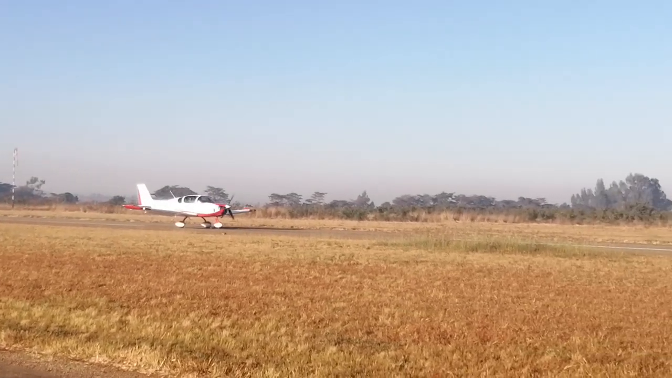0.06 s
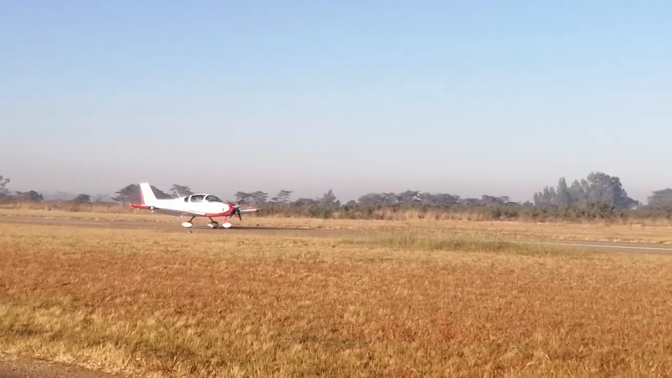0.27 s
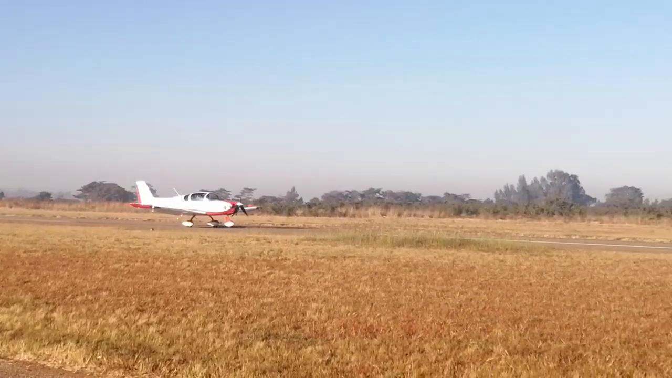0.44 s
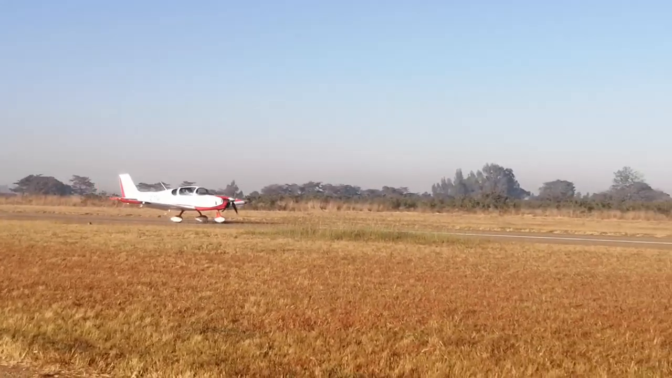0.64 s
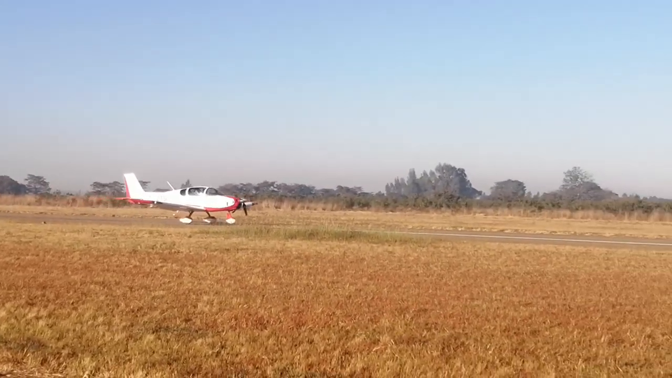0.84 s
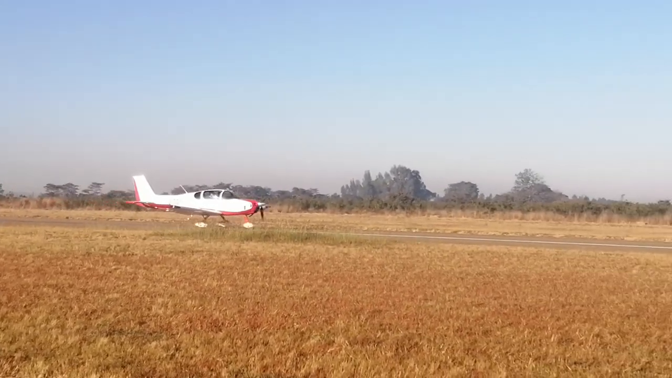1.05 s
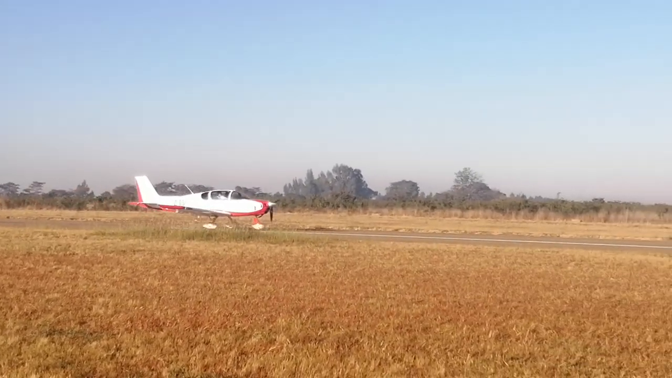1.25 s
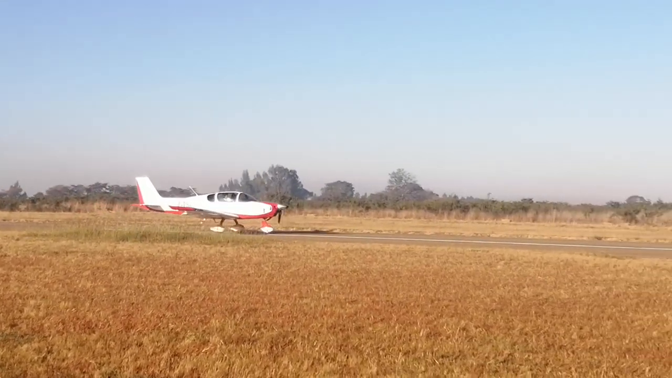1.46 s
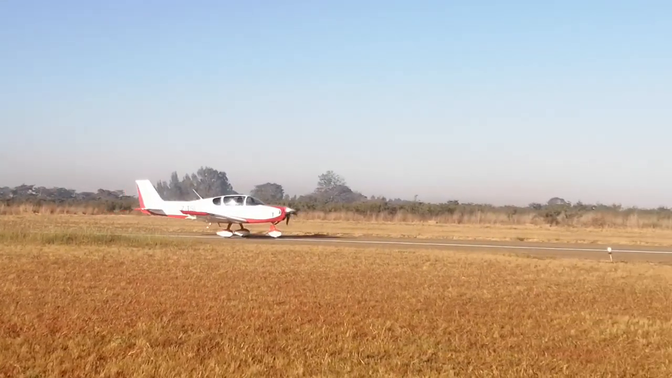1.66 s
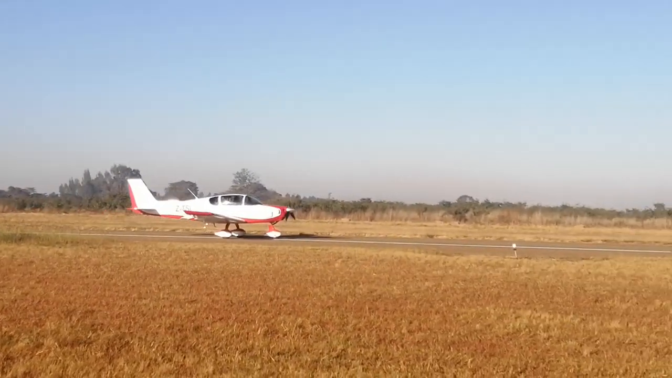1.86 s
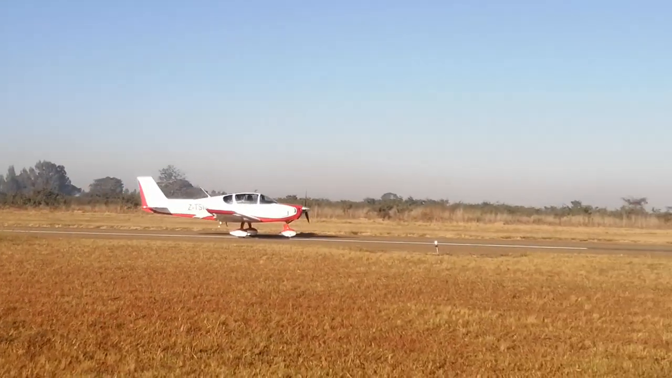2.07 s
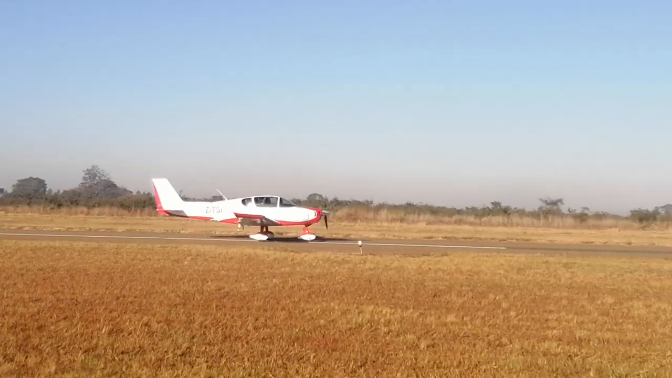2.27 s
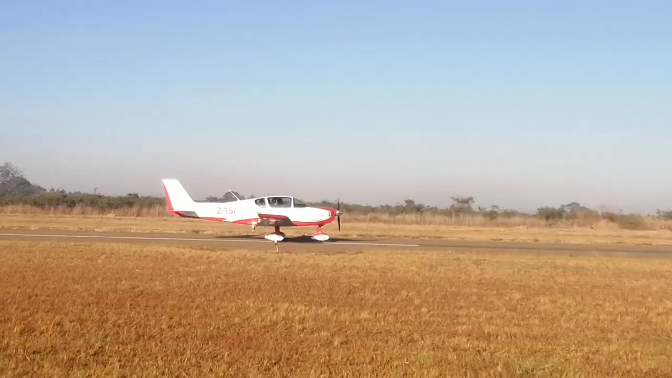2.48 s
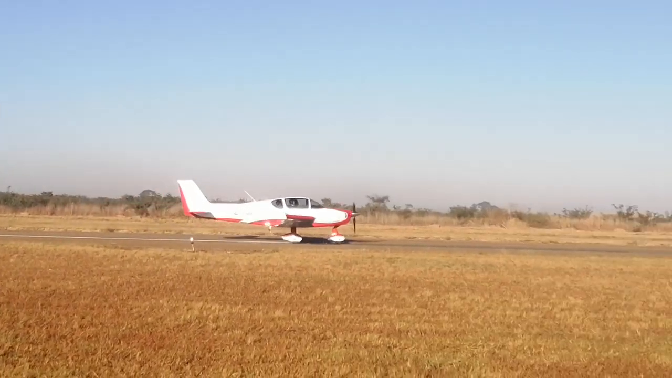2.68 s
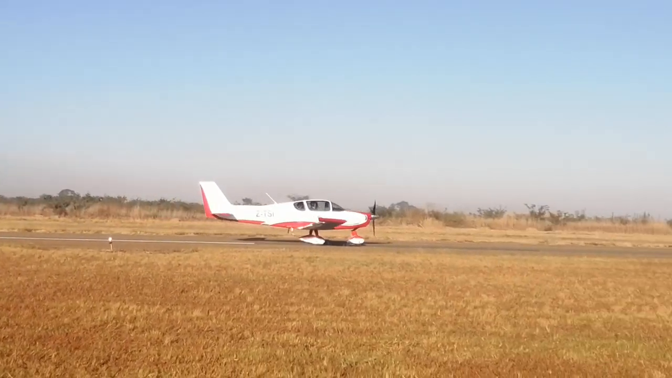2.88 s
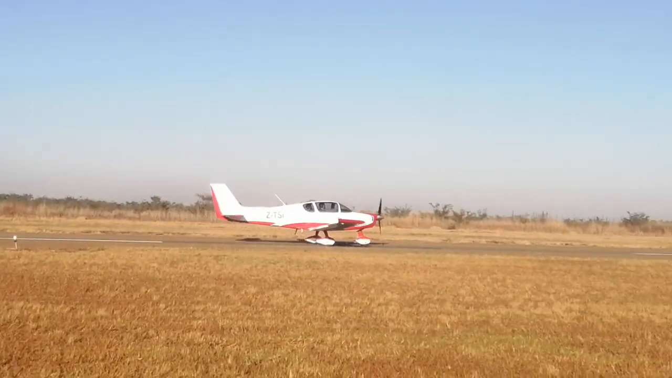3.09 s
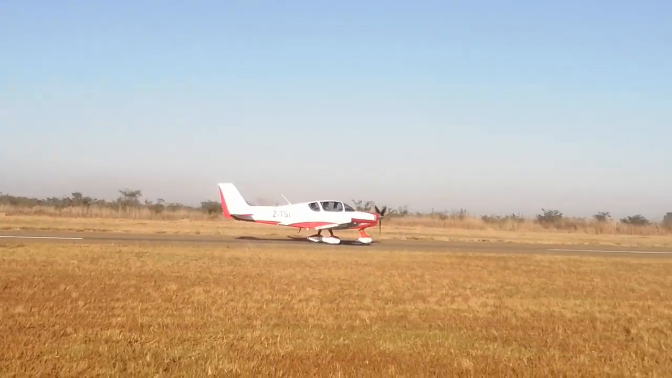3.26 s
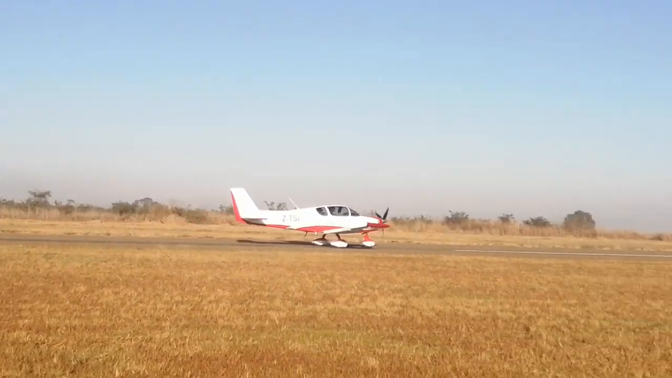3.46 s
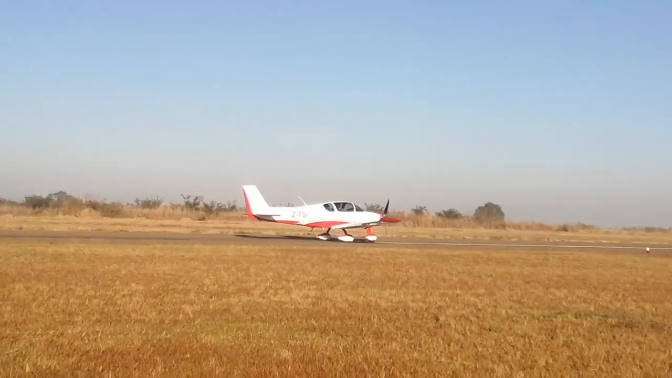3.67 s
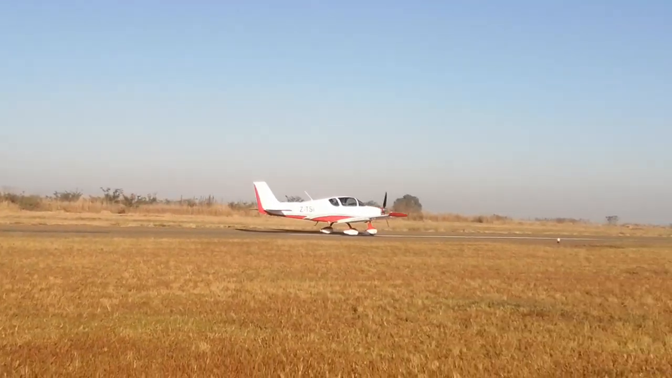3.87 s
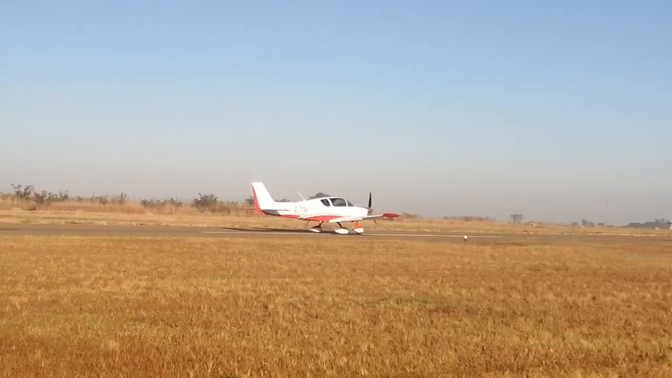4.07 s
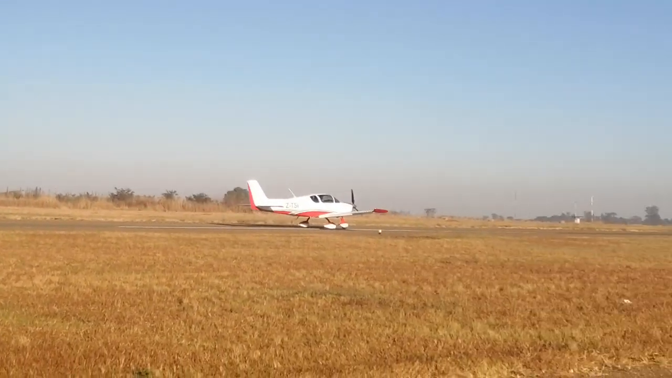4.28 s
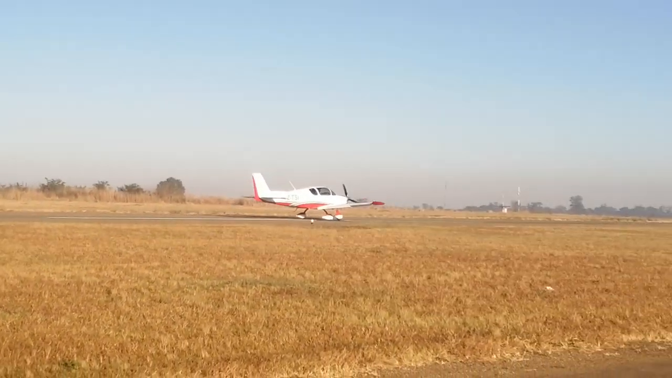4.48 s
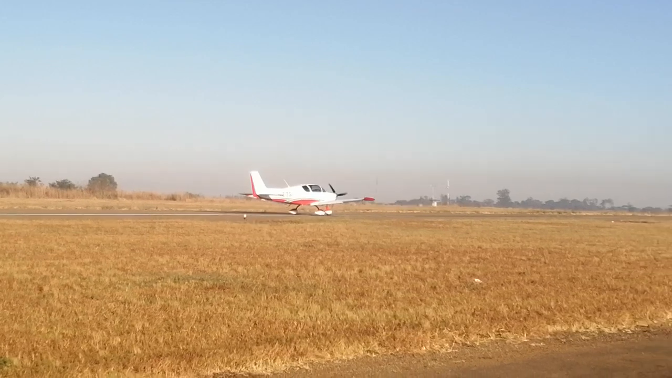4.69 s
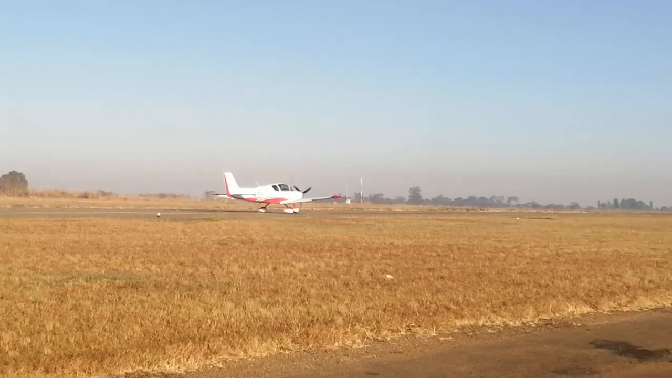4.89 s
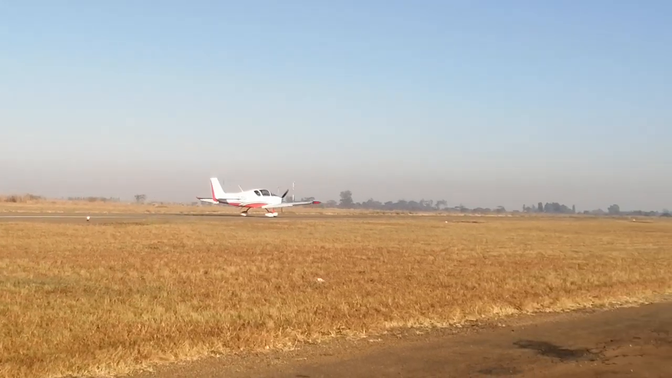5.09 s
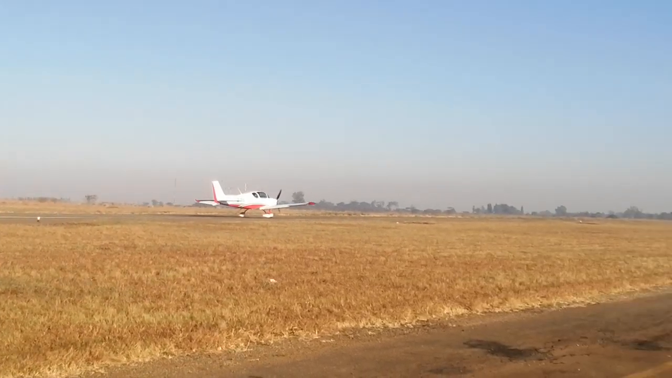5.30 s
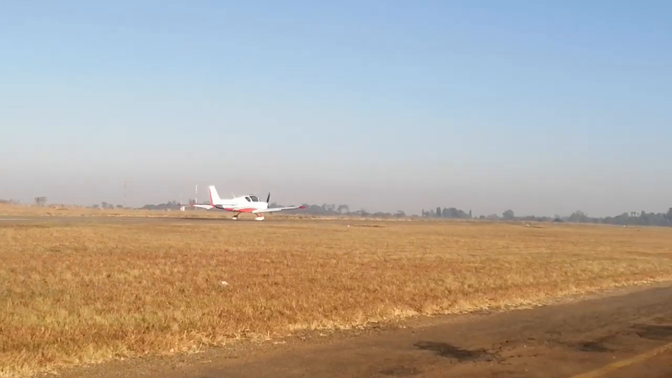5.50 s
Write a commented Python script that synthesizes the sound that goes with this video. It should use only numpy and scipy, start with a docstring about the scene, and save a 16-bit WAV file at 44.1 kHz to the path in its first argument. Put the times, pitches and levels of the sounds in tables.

```python
"""A droning, swishing roar goes by on a small stereo microphone: a light aircraft rolls past at takeoff power.
Tones and noise at the blade rate make the geared three-blade propeller; each blade also sheds a short chirp.
Wavering tones at the firing rate make the exhaust hum, with shaped noise for wash, air hiss, rasp and roar.
The pitch sinks as it passes and the drone fades in and out as it draws away; a faint steady hum and a
light breeze lie underneath."""
import sys
import numpy as np
from scipy import signal
from scipy.fft import rfft, irfft, next_fast_len
from scipy.io import wavfile
from scipy.ndimage import uniform_filter1d, map_coordinates

SR = 44100
rng = np.random.default_rng(int(sys.argv[2]) if len(sys.argv) > 2 else 0)


def output_pcm(signal):
    """Save a mono or channel-first signal as 16-bit PCM at the path in sys.argv[1].

    Samples are clipped to [-1, 1] before scaling.
    """
    pcm = np.clip(np.atleast_2d(signal).T, -1, 1) * 32767
    wavfile.write(sys.argv[1], SR, np.round(pcm).astype(np.int16))


N = 244314  # samples
FIRINGS_PER_BLADE = 1.698

# exhaust pulses as heard, Doppler shift included: t/s, firing rate f/Hz
FIRING_RATE = [(0.0, 187.4), (1.0, 186.7), (2.0, 184.2), (2.5, 182.7), (3.0, 181.8), (3.5, 179.6),
               (4.0, 177.7), (4.5, 175.2), (5.0, 173.8), (5.54, 173)]
# the pass: t/s, aspect (-1 nose on, 0 abeam, 1 tail on), bass left-right/dB, treble left-right/dB
PASSAGE = [(0, -0.93, 2.4, -1), (.7, -0.82, 0.98, -0.5), (1.3, -0.64, 2.7, 0), (1.8, -.3, 4.3, 1.5),
           (2.7, 0.079, 3.8, 3), (3.7, 0.62, 3.5, 3), (4.3, 0.6, 2, 4), (4.8, 0.83, 3, 3.5),
           (5.54, 0.99, 1.02, 3.5)]
# how each source radiates, before its own gains: aspect of its beam, level on the beam/dB,
# loss one unit of aspect off it/dB, level in all directions/dB; the ticking counts against AIR_STRENGTH
RADIATION = {"drone": (0.35, -15.8, 15, -48), "second": (-0.06, -27, 16.5, -46),
             "third": (0.29, -37, 80, -52), "chop": (0.06, -43.5, 55, -57), "burr": (0.2, -44, 60, -72),
             "wash": (0.31, -39.5, 4.5, -58), "ticking": (-0.8, -6, 7, -24)}
# base strength of the air noise, before each source's offset: t/s, level/dB
AIR_STRENGTH = [(0, -42.5), (.6, -41.5), (.78, -43.5), (.9, -41), (1.11, -40), (1.17, -43), (1.3, -41),
                (1.5, -42), (1.75, -42.5), (2.0, -39.5), (2.3, -41), (2.8, -41), (3.2, -42.5), (3.78, -42),
                (3.87, -46), (4.07, -42.5), (4.2, -43.5), (4.4, -45.5), (4.6, -45.5), (4.8, -48),
                (5.1, -46.5), (5.54, -46.5)]


def amp(db):
    """Decibels to gain."""
    return 10 ** (np.asarray(db) / 20)


def unit(x):
    """Scaled to rms 1."""
    return x / np.sqrt(np.mean(x ** 2) + 1e-20)


def along(points, hz):
    """(Hz, value) points read on a log axis."""
    f, v = np.transpose(points)
    return np.interp(np.log(hz + 1), np.log(f + 1), v)


def curves(rows):
    """One value per sample for each column after the time."""
    s, *cols = np.transpose(rows)
    return [np.interp(np.arange(N) / SR, s, c) for c in cols]


def wobble(rate):
    """A smooth random curve, rate knots a second."""
    knots = rng.standard_normal(int(N * rate / SR) + 4)
    return map_coordinates(knots, [np.arange(N) * rate / SR])


def filtered(x, response):
    """x times a complex response of frequency."""
    m = next_fast_len(N + SR // 2)
    return irfft(rfft(x, m) * response(np.fft.rfftfreq(m, 1 / SR)), m)[..., :N]


def noise(spectrum):
    """Noise of rms 1 in the given colour."""
    return unit(filtered(rng.standard_normal(N), lambda hz: amp(along(spectrum, hz))))


def panned(x, balance_db):
    """Shared between left and right at constant mid level."""
    left = amp(balance_db)
    return x * np.array([2 * left, 2 + 0 * left]) / (1 + left)


def ports(x, aspect):
    """The stereo pair that the microphone housing makes of a far sound, with a mid of rms 1."""
    # level between the ports: f/Hz, left-right/dB for the approach, abeam, for the departure
    port_balance = [(300, 5, 1, -4), (550, 13, 9.5, -17), (955, 2, -6.5, -6), (1280, -2, -4, -3),
                    (1586, -9, -16.5, -16), (2010, -19, -0.5, -2), (2420, 14, 11, -11),
                    (2600, -15, -11, -22), (2900, -16, -12, -7), (3150, -1, -16, 0), (3580, -16, -39, -29),
                    (4100, -17, -27, -27), (4500, -8, -19, -7), (5200, -15, -3, 5), (5700, -7, 8, -9),
                    (6330, 6, -10, 0), (7100, -14.5, -4, -3), (7400, -1, 8, 2), (8100, -15, -19, -4),
                    (9000, -5.5, -6, 2), (12800, -1, -26, -4)]
    # phase between the ports: f/Hz, left lead/rad for the approach, for the departure
    port_lead = [(100, .05, .05), (400, .2, .1), (800, .7, .5), (1100, 1.4, 1.4), (1400, 1, 1),
                 (1750, 3.1, 3.1), (2100, 4.4, 4.8), (2550, 9.4, 9.4), (3100, 12.8, 15), (3700, 19.3, 19.5),
                 (4200, 20.2, 20.2), (4750, 21.6, 22), (5300, 22.5, 24.5), (5900, 25.1, 27.8),
                 (7200, 29.5, 32), (9000, 31, 41), (14000, 44, 56)]

    def read(table, hz):
        points = [(f, np.interp(aspect, np.linspace(-1, 1, len(row)), row)) for f, *row in table]
        return along(points, hz)

    def response(hz):
        ratio = amp(read(port_balance, hz))
        lead = read(port_lead, hz)
        return np.array([ratio * np.exp(.5j * lead), np.exp(-.5j * lead)]) / np.sqrt(1 + ratio ** 2)

    pair = filtered(x, response)
    return pair / np.std(pair.mean(0))


def hollowed(x):
    """The two ports cancel each other in a narrow treble band that sinks as the aircraft passes."""
    abeam_hz, sink_hz, width_hz, depth_db = 5090, 545, 140, 5.5  # sink per unit of aspect
    mid = x.mean(0)
    hz, s, z = signal.stft(mid, SR, nperseg=1024)
    centre = abeam_hz - sink_hz * np.interp(s * SR, np.arange(N), curves(PASSAGE)[0])
    gain = amp(-depth_db * np.exp(-((hz[:, None] - centre) / width_hz) ** 2))
    hollow_mid = signal.istft(z * gain, SR, nperseg=1024)[1][:N]
    return x - mid + hollow_mid


def leaned(x):
    """The housing favours the right port in the upper bass."""
    # f/Hz, left-right/dB
    bass_lean = [(170, 0), (280, -2), (450, -4)]
    return filtered(x, lambda hz: amp(along(bass_lean, hz) * np.array([[.5], [-.5]])))


def beamed(beam):
    """Gain of a source as its beam sweeps past the listener."""
    centre, peak_db, fall_db, around_db = beam
    return np.hypot(amp(peak_db - fall_db * (curves(PASSAGE)[0] - centre) ** 2), amp(around_db))


def fading():
    """Gain that beats slowly as the aircraft draws away, with round swells and narrow troughs."""
    start_s, trough_s, period_s = 3.47, 4.61, 0.363
    first_depth, last_depth = 0.077, 0.48  # 0-1
    t = np.arange(N) / SR
    depth = np.interp(t, [start_s - .1, start_s, t[-1]], [0, first_depth, last_depth])
    beat = np.abs(1 - depth * np.exp(2j * np.pi * (t - trough_s) / period_s))
    return beat / np.hypot(1, depth)


def bursts(blade, depth_db, scatter_db):
    """A swell as each blade swings towards the listener, every one of its own size."""
    number = np.round(blade / (2 * np.pi)).astype(int)
    size = rng.standard_normal(number[-1] + 1)[number]
    swell_db = depth_db * np.cos(blade) + scatter_db * size * (1 + np.cos(blade)) / 2
    gate = amp(swell_db)
    return gate / np.sqrt(uniform_filter1d(gate ** 2, size=8192))  # steady running power


def breeze():
    """Light air stirs each port on its own."""
    # f/Hz, relative level/dB
    breeze_colour = [(10, -33), (35, -6), (90, -1), (200, 5.5), (400, -4), (1000, -42), (3000, -120)]
    return amp(-47 + 2.5 * wobble(4)) * np.array([noise(breeze_colour), noise(breeze_colour)])


def idling():
    """Low, slightly unsteady tones hold their pitch, like an engine idling far off."""
    # f/Hz, rms level/dB
    idle_tones = [(50, -49), (75, -43), (100, -47), (125, -46.5)]
    t = np.arange(N) / SR
    hum = 0
    for hz, db in idle_tones:
        hum = hum + amp(db + 0.7 * wobble(2.54)) * np.cos(2 * np.pi * hz * t + 0.54 * wobble(2.97))
    return np.sqrt(2) * hum


def roar():
    """The slipstream gives a hollow roar once the tail points at the listener."""
    # f/Hz, relative level/dB
    roar_colour = [(300, -40), (440, -6), (540, 1), (650, 1), (900, -9), (1400, -42)]
    # t/s, level/dB
    roar_strength = [(4.45, -70), (4.7, -57), (4.9, -52), (5.15, -59), (5.35, -48.5), (5.54, -51)]
    return amp(curves(roar_strength)[0]) * noise(roar_colour)


def hiss(blade):
    """Broad air noise changes colour with the aspect; a part arrives scattered by the field."""
    # colours of the air ahead, abeam and behind: f/Hz, relative level/dB
    ahead_colour = [(300, -65), (500, -19), (800, -6.5), (1500, 2.5), (2350, -0.5), (2900, 5), (3500, -10),
                    (4050, -3), (5000, -4.5), (6600, -10), (7200, -0.5), (8300, -19), (9200, -9),
                    (13500, -32), (17000, -64)]
    abeam_colour = [(300, -100), (1500, -4), (2600, -2.5), (3300, -8), (4000, 4.5), (4800, -5), (5600, -12),
                    (6300, -4), (8200, -12), (9100, -3), (10200, -20), (11000, -18.5), (13500, -23.5),
                    (17000, -33)]
    behind_colour = [(300, -63), (550, -7.5), (1000, -4.5), (1500, -2.5), (2200, -7), (3100, -9.5),
                     (3700, 3.5), (4700, -10.5), (5300, -14), (5850, -9.5), (6400, -12.5), (7000, -12),
                     (7900, -12), (9500, -22), (12000, -31), (17000, -47)]
    # offset from AIR_STRENGTH ahead, abeam, behind: level/dB
    offsets = [6, 0.5, 5]
    aspect = curves(PASSAGE)[0]
    total = 0
    for centre, colour, db in zip([-1, 0, 1], [ahead_colour, abeam_colour, behind_colour], offsets):
        share = np.clip(1 - np.abs(np.clip(aspect, -1, 1) - centre), 0, 1)
        direct = ports(noise(colour) * bursts(blade, depth_db=1.2, scatter_db=1.5), centre)
        scattered = amp(-8) * np.array([noise(colour), noise(colour)])
        total = total + np.sqrt(share) * amp(db) * (direct + scattered)
    return amp(curves(AIR_STRENGTH)[0] + .4 * wobble(16)) * total


def ticking(blade):
    """A fine, bright sizzle once every turn of the shaft, heard mostly from ahead."""
    # f/Hz, relative level/dB
    tick_colour = [(3500, -35), (5000, -2), (5900, -2), (6600, 4), (7200, 2), (8300, -15), (9300, 1.5),
                   (10500, -14), (14000, -28), (17000, -64)]
    shaft = blade / 3  # three blades
    gate = unit(amp(2.5 * wobble(30)) * np.cos(shaft / 2) ** 8)  # uneven ticks
    sizzle = ports(noise(tick_colour) * gate, aspect=-0.7)
    return beamed(RADIATION["ticking"]) * amp(curves(AIR_STRENGTH)[0]) * sizzle


def burr(blade):
    """A lower, woodier flutter of the blades, thrown just behind the propeller disc."""
    # f/Hz, relative level/dB
    burr_colour = [(420, -50), (560, -13), (680, -3), (850, 1), (980, -1), (1150, -35), (1600, -80)]
    flutter = noise(burr_colour) * bursts(blade, depth_db=4, scatter_db=2.5)
    return beamed(RADIATION["burr"]) * ports(flutter, aspect=0)


def snapping(number):
    """Extra strength of the blades that cut a strong eddy and snap out of the swish."""
    # t/s, level against the usual chirp/dB, blades in a row
    snaps = [(2.341, 5, 1), (2.48, 5.5, 4), (2.553, 5.5, 2), (2.618, 8, 1), (2.74, 3, 3), (2.777, 3, 4),
             (2.86, -3, 2), (2.888, 1, 1), (2.926, 5.5, 2), (2.982, 6, 2), (3.125, 4, 2), (3.236, 3, 2),
             (3.36, 6, 3), (3.749, 2, 2), (4.008, 4, 2), (4.133, 5, 2), (4.2, 8.5, 1)]
    extra = 0
    for s, db, blades in snaps:
        struck = number[round(s * SR)] + np.arange(round(blades))
        extra = extra + amp(db) * np.isin(number, struck)
    return extra


def chirps(blade):
    """Each blade sheds one rising chirp; eddies bend the pitch and bunch the chirps into groups."""
    shedding_hz, rise_hz_per_s, half_length_s = 1545, 75000, .002
    eddy_rate, rough_rate = 60, 380  # random knots a second
    eddy_db, blade_scatter_db = 1.7, 1.3
    pitch_drift, slip_rad, jitter_rad = .045, 1.0, .66  # drift as a share of the pitch
    turn = blade / (2 * np.pi)
    number = np.round(turn).astype(int)
    since = (turn - number) * FIRINGS_PER_BLADE / curves(FIRING_RATE)[0]  # s from the chirp's middle
    pitch = shedding_hz * (1 + pitch_drift * wobble(eddy_rate))
    slip = slip_rad * wobble(eddy_rate) + jitter_rad * wobble(rough_rate)
    phase = 2 * np.pi * since * (pitch + rise_hz_per_s * since / 2) + slip
    scatter_db = blade_scatter_db * rng.standard_normal(number[-1] + 1)[number]
    size = amp(eddy_db * wobble(eddy_rate) + scatter_db)
    envelope = np.exp(-(since / half_length_s) ** 2)
    return np.hypot(size, snapping(number)) * envelope * np.cos(phase)


def swish(blade):
    """Vortices shed by each blade sing in a short chirp over a steadier rush, with a gusty high rasp."""
    # colours of the rush and the rasp: f/Hz, relative level/dB
    rush_colour = [(380, -74), (520, -29), (700, -14.5), (860, -6.5), (1080, -14.5), (1270, -3.5),
                   (1480, 2.5), (1750, 2), (2000, -3), (2300, -11.5), (2800, -23), (4500, -64)]
    rasp_colour = [(1500, -100), (2600, -48), (3250, 3), (3550, 8.5), (3950, 11.5), (4350, -30),
                   (4800, -36), (7000, -100)]
    # strength of the swish, and of the rasp from behind in gusts: t/s, level/dB
    swish_strength = [(0, -46.5), (.45, -40), (.63, -35), (.78, -35), (.88, -34.5), (.99, -30),
                      (1.2, -33.5), (1.42, -31), (1.68, -31.5), (1.85, -30.5), (2.4, -29), (2.6, -30.5),
                      (2.8, -28.5), (2.9, -30), (3.3, -29.5), (3.45, -33.5), (3.75, -31.5), (3.83, -36),
                      (3.95, -33.5), (4.22, -33.5), (4.38, -36.5), (4.55, -41), (5.54, -49)]
    rasp_strength = [(2.3, -45), (3.15, -48), (3.42, -41), (3.58, -65), (3.78, -38.5), (3.9, -44.5),
                     (4.07, -38), (4.13, -43), (4.2, -36.5), (4.3, -44.5), (4.58, -42.5), (4.8, -51),
                     (4.93, -43), (5.06, -43), (5.16, -63), (5.43, -46), (5.54, -61)]
    nose_on = np.clip(-curves(PASSAGE)[0], 0, 1)
    share = np.clip(.62 - .35 * nose_on ** 2, .1, .9)  # chirps' part of the power
    rush = noise(rush_colour) * bursts(blade, depth_db=1.4, scatter_db=1.1)
    song = np.sqrt(share) * ports(chirps(blade), aspect=0) + np.sqrt(1 - share) * ports(rush, aspect=0)
    rasp = ports(noise(rasp_colour) * bursts(blade, depth_db=4, scatter_db=2), aspect=0.7)
    return amp(curves(swish_strength)[0]) * song + amp(curves(rasp_strength)[0]) * rasp


def wash_and_shaft(shaft):
    """Turbulent wash throbs with the shaft, and unequal blades add weak tones at its multiples."""
    # f/Hz, relative level/dB
    wash_colour = [(12, -52), (26, -12), (50, -8), (80, 2.5), (130, 2), (200, 0), (260, -0.5), (330, -11.5),
                   (400, -14), (480, -28), (700, -59), (1500, -120)]
    # multiple of the shaft rate, peak level against the wash beam/dB
    shaft_tones = [(1, -10.5), (2, -13), (4, -1), (7, -18), (8, -12)]
    wash = amp(7.0) * unit(noise(wash_colour) * amp(1.2 * np.cos(shaft)))
    lines = 0
    for k, db in shaft_tones:
        lines = lines + amp(db + 2.3 * wobble(5)) * np.cos(round(k) * shaft + 1.0 * wobble(7.2))
    return beamed(RADIATION["wash"]) * (wash + lines)


def engine(firing):
    """Exhaust pulses hum at the firing rate with overtones; a faint higher tone shows as the tail turns."""
    # the hum, weakest far ahead and abeam: t/s, rms level/dB
    hum_strength = [(0, -39.5), (.6, -35.5), (1.15, -33), (1.55, -30), (2.2, -34.5), (2.7, -33.5),
                    (3.5, -32.5), (4.45, -29), (4.95, -32.5), (5.22, -29.5), (5.54, -32)]
    # its octave swells coming abeam, drops out just past, returns behind: t/s, rms level/dB
    octave_strength = [(0, -53), (.7, -53), (1.9, -51.5), (2.35, -47.5), (2.65, -44.5), (2.95, -43.5),
                       (3.15, -52), (3.3, -55), (3.7, -45.5), (3.88, -48), (4.2, -45.5), (4.5, -49),
                       (5.54, -51.5)]
    tail_s, tail_width_s, tail_db, tail_per_firing = 4.17, 0.21, -46.5, 2.25
    hum_gain = amp(curves(hum_strength)[0] + 1.94 * wobble(8.6))
    hum_gain = hum_gain * fading() ** 0.79  # shares most of the drone's fading
    hum = hum_gain * np.cos(firing + 0.26 * wobble(7.7))
    octave = amp(1.3 * wobble(4.23)) * np.cos(2 * firing + 0.1 * wobble(13))
    twelfth = amp(-17.5) * np.cos(3 * firing + 0.25 * wobble(22))
    overtones = amp(curves(octave_strength)[0]) * (octave + twelfth)
    swell = np.exp(-((np.arange(N) / SR - tail_s) / tail_width_s) ** 2)
    tail_tone = amp(tail_db) * swell * np.cos(tail_per_firing * firing)
    return np.sqrt(2) * (hum + tail_tone + overtones)


def propeller(blade):
    """Each blade sends a rounded suction pulse, with a noisy chop abeam; nose on, inflow blurs the tone."""
    # colours of the turbulent inflow and the chop: f/Hz, relative level/dB
    inflow_colour = [(20, -45), (45, -23), (72, -4), (88, 6), (100, 1), (118, 5), (135, -11), (170, -43),
                     (500, -120)]
    chop_colour = [(60, -73), (150, -49), (250, 7.5), (330, 1), (420, -8), (500, -25), (680, -1.5),
                   (850, -2), (1050, -15), (2500, -120)]
    # far ahead the drone comes and goes unevenly: t/s, level/dB
    approach_waver = [(0.05, 3), (.15, -1), (.4, 1), (.48, 7), (.62, -5), (.72, -9), (.82, 6), (.92, -8),
                      (1.0, -2), (1.23, 4), (1.39, -5), (1.47, 0)]
    aspect = curves(PASSAGE)[0]
    nose_on = np.clip(-aspect, 0, 1)
    blurred = np.clip(.6 * nose_on ** 3, .002, .8)  # noise part of the power
    waver_db = curves(approach_waver)[0] + nose_on ** 2 * wobble(6.8)  # flutters nose on
    drone = beamed(RADIATION["drone"]) * fading() * amp(waver_db)
    tone = -np.sqrt(2) * amp(0.081 * wobble(40)) * np.cos(blade + 0.026 * wobble(24))
    first = drone * (np.sqrt(1 - blurred) * tone + np.sqrt(blurred) * noise(inflow_colour))
    second_gain = beamed(RADIATION["second"]) * amp((0.97 + 2.3 * aspect ** 2) * wobble(15))
    second = second_gain * np.cos(2 * blade - .4 + 0.11 * wobble(24))
    third_gain = beamed(RADIATION["third"]) * amp(1.05 * wobble(7))
    third = third_gain * np.cos(3 * blade - .8 + 0.34 * wobble(24))
    chop = beamed(RADIATION["chop"]) * noise(chop_colour) * bursts(blade, depth_db=3, scatter_db=3)
    return first - np.sqrt(2) * (second + third) + chop


def scene():
    """One shaft speed drives engine and propeller; the stereo balance shifts during the pass."""
    _, bass_db, treble_db = curves(PASSAGE)
    firing = 2 * np.pi * np.cumsum(curves(FIRING_RATE)[0]) / SR  # phases in radians
    blade = firing / FIRINGS_PER_BLADE
    background = breeze() + idling()
    treble = hollowed(hiss(blade) + ticking(blade) + burr(blade) + swish(blade))
    bass = roar() + wash_and_shaft(blade / 3) + engine(firing) + propeller(blade)
    return background + panned(treble, treble_db) + leaned(panned(bass, bass_db))


def record(dry):
    """The recorder keeps nothing from its band limit up."""
    top_hz = 15100
    return filtered(dry, lambda hz: hz < top_hz)


dry = scene()
out = record(dry)
output_pcm(out)
```